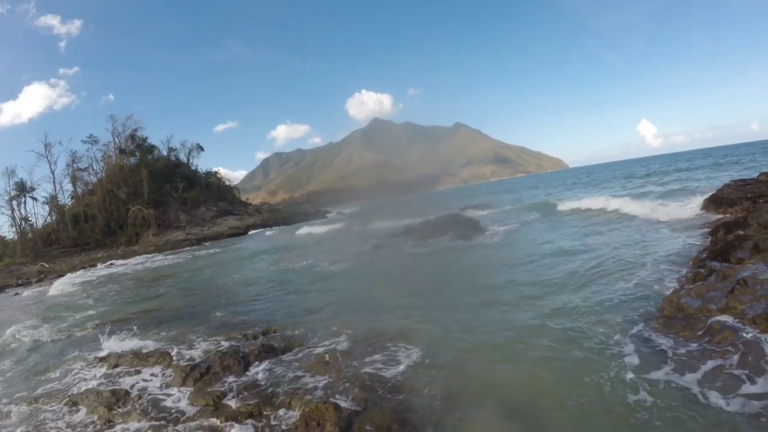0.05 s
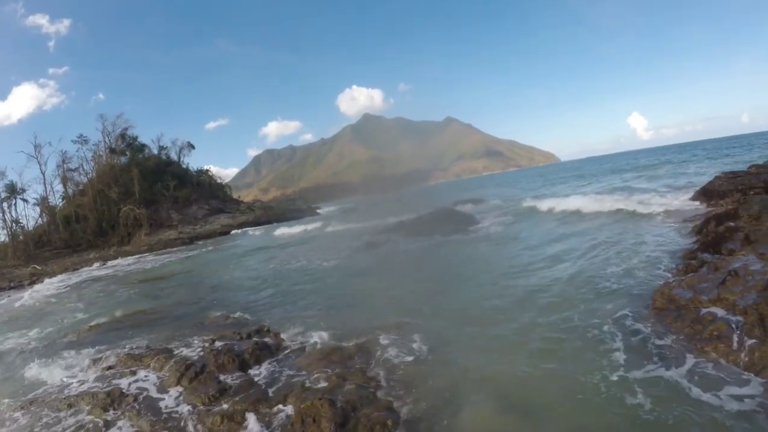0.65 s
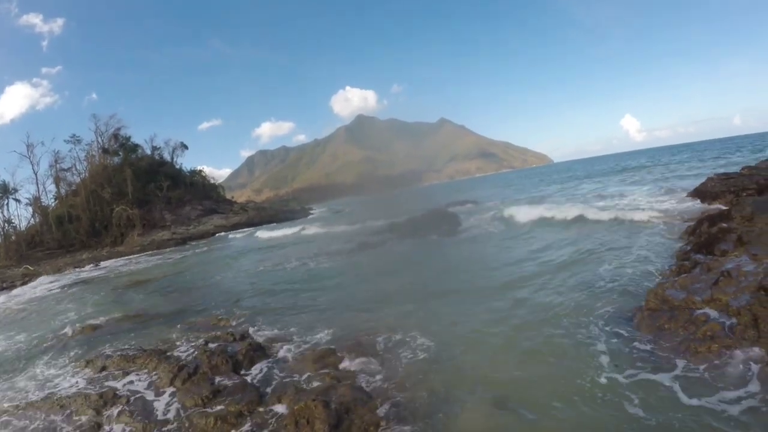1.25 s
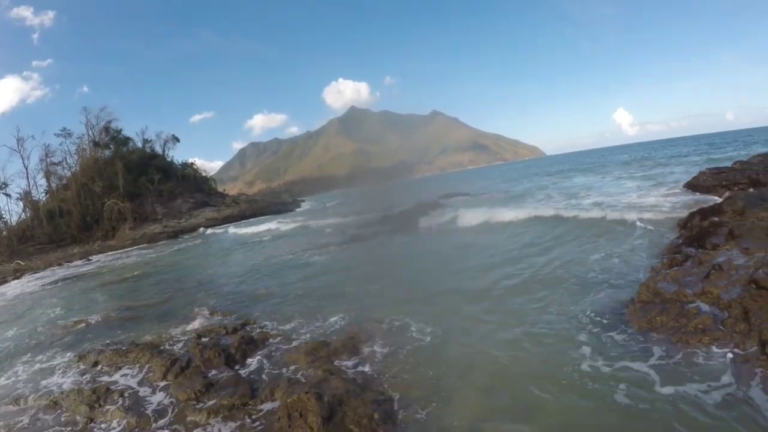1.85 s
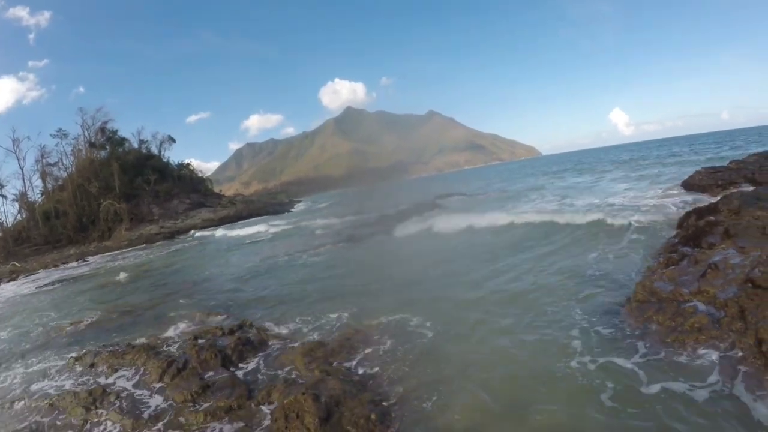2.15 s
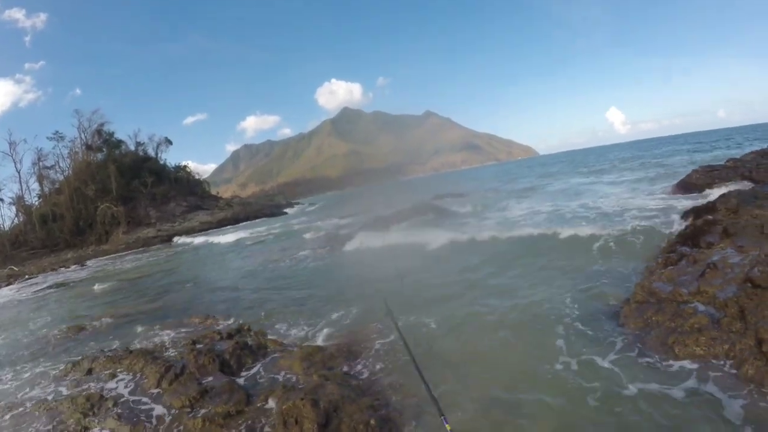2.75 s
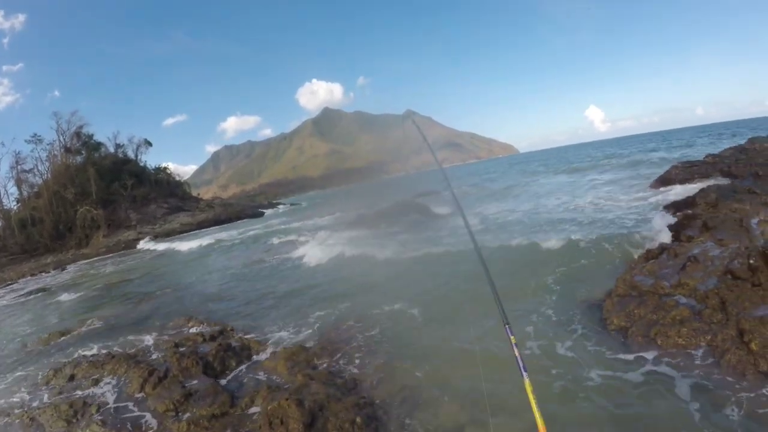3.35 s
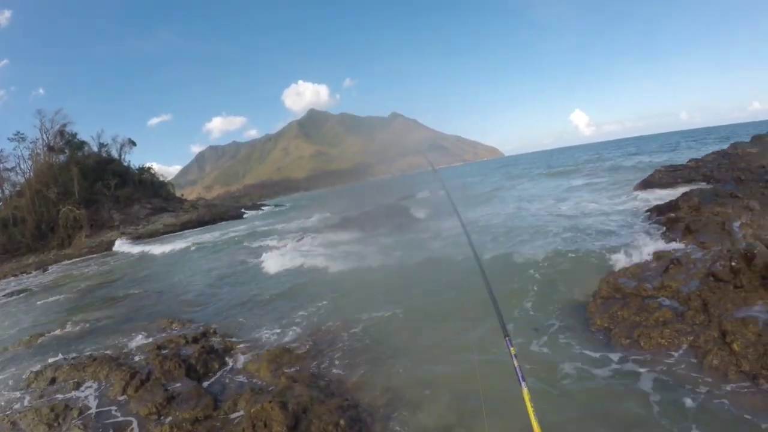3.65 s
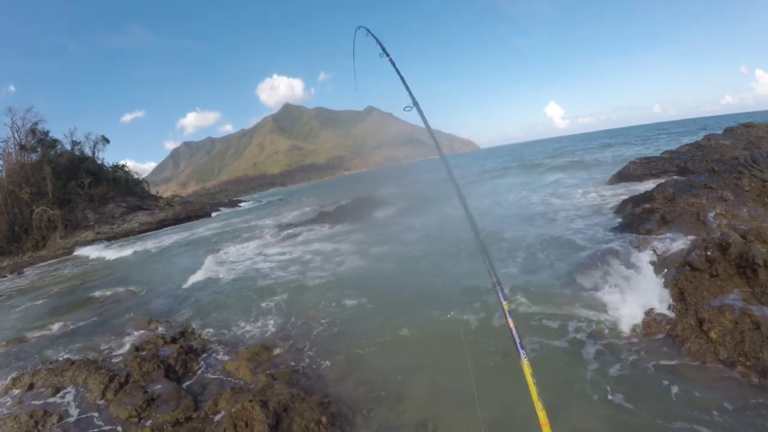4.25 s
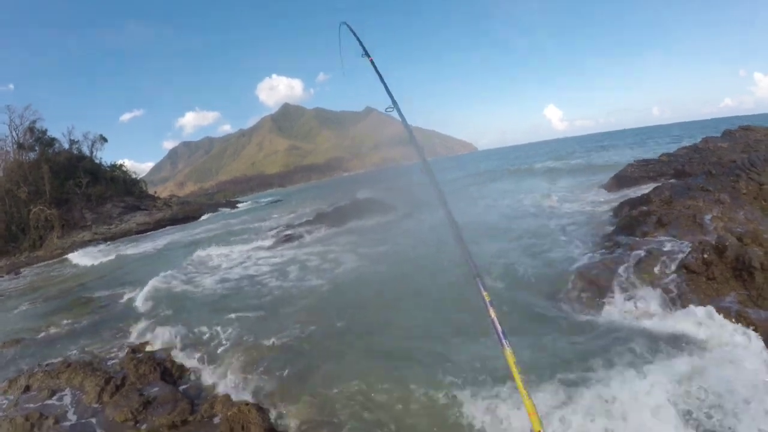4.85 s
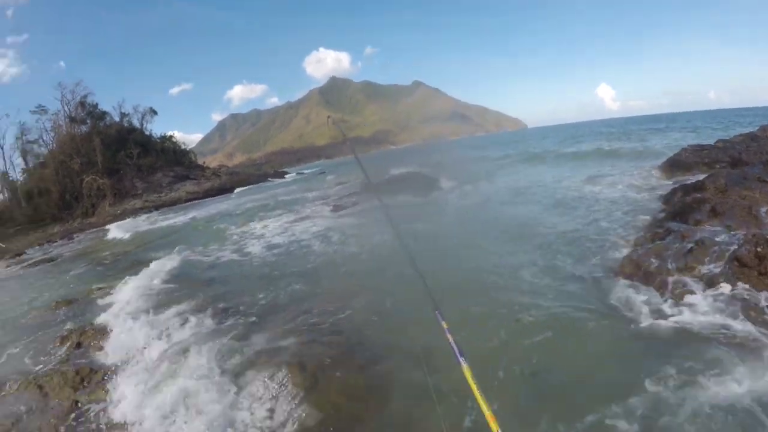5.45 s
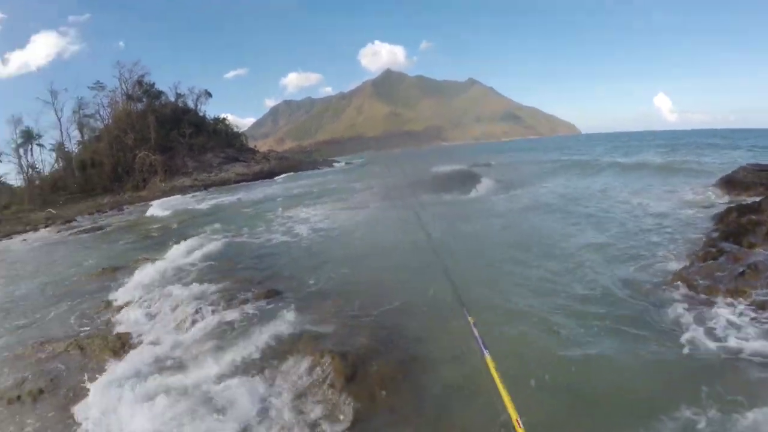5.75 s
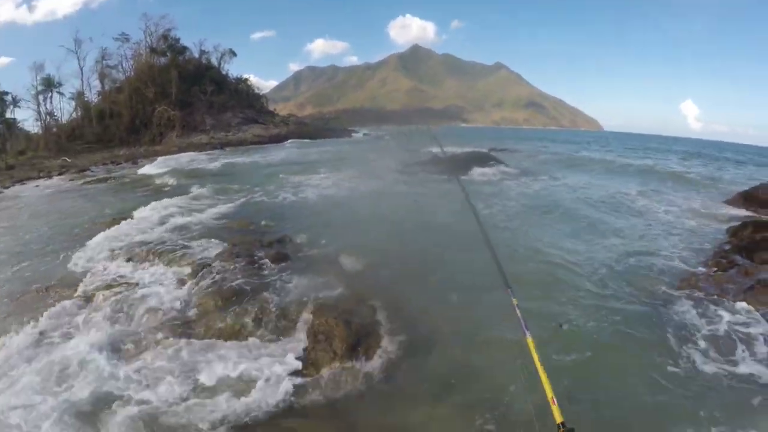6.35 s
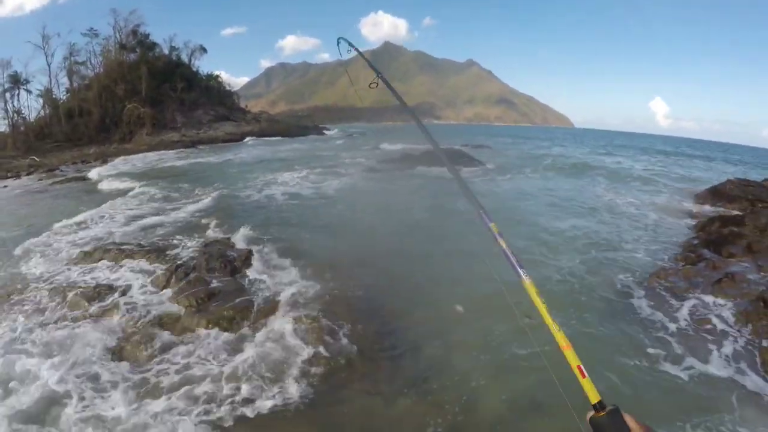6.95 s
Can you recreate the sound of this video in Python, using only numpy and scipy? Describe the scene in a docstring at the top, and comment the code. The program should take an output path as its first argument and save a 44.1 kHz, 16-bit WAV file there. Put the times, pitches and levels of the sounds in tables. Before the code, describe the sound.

Surf washes steadily, then a wave slaps and breaks over nearby rocks while wind rumbles on the microphone.

```python
"""Surf on a windy, rocky shore

Far breakers wash steadily. A near wave slaps the rocks on the right, bursts into spray, booms,
then pours over the rocks on the left and drains. The water is rushing noise plus thousands of
tiny ringing bubbles. We listen through a small camera with a left and a right microphone port
(sound hole); wind swirls against it and makes a low rumble."""
import sys
import numpy as np
from scipy import signal
from scipy.fft import rfft, irfft, next_fast_len
from scipy.io import wavfile
from scipy.ndimage import uniform_filter1d, map_coordinates

SR = 44100
rng = np.random.default_rng(int(sys.argv[2]) if len(sys.argv) > 2 else 0)


def put_to_file(sound):
    """Save the sound as 16-bit audio at rate SR, in the file named by the first command-line argument."""
    columns = np.atleast_2d(sound).T  # one column per channel
    safe = np.clip(columns, -1, 1)
    whole_steps = np.round(safe * 32767)
    wavfile.write(sys.argv[1], SR, whole_steps.astype(np.int16))


N = 312217
TIME = np.arange(N) / SR
TOP_HZ = 15000
SPLIT = np.array([[0.5], [-0.5]])  # adds half of a value on the left, takes half away on the right


def amp(db):
    """Turn decibels into a gain to multiply by."""
    return 10 ** (np.asarray(db) / 20)


def unit(x):
    """Scale a sound to an average (rms) strength of 1."""
    return x / np.sqrt(np.mean(x ** 2) + 1e-20)


def at_pitch(table, hz):
    """Read between the rows of a (frequency, value) table, on a log frequency scale."""
    row_hz, values = np.transpose(table)
    return np.interp(np.log(hz + 1), np.log(row_hz + 1), values)


def over_time(table):
    """Join the rows of a (time, value) table with straight lines."""
    return np.interp(TIME, *np.transpose(table))


def wobble(rate):
    """A smooth random curve through rate points a second."""
    points = rng.standard_normal(int(N * rate / SR) + 4)
    return map_coordinates(points, [np.arange(N) * rate / SR])


def swell(t, width):
    """A bell shape of height 1 around t = 0."""
    return np.exp(-(t / width) ** 2 / 2)


def filtered(x, response):
    """Multiply each frequency in x by response(hz)."""
    size = next_fast_len(N + SR // 2)
    return irfft(rfft(x, size) * response(np.fft.rfftfreq(size, 1 / SR)), size)[..., :N]


def rush(patchy_db):
    """Rushing water: two noises that share random loud and soft patches in time and pitch."""
    spectra = signal.stft(rng.standard_normal((2, N)), nperseg=512)[2]
    patches = uniform_filter1d(rng.standard_normal(spectra.shape[1:]), size=9, axis=0)
    patches = unit(uniform_filter1d(patches, size=11, axis=1))
    return unit(signal.istft(spectra * amp(patchy_db * patches), nperseg=512)[1][:, :N])


# The sea's tone through the camera's case: (frequency [Hz], relative level [dB])
SEA_TONE = [(100, -4.5), (250, 3), (400, -4.5), (800, 0), (1300, -2), (1950, -4.5), (2350, -7), (3250, -6),
            (4900, -12.5), (7000, -11), (8300, -19.5), (10500, -31), (13800, -39), (14800, -50)]
# Narrow bands that the case boosts or weakens: (frequency [Hz], width [Hz], gain [dB])
CASE_RESONANCES = [(1225, 76, 3), (1400, 56, 1.1), (1797, 210, 3), (2090, 90, 1.1), (2250, 98, -0.6),
                   (2450, 96, 0.9), (2770, 200, -2), (3130, 97, 1), (5100, 300, -0.6)]
def sea_tone_db(hz):
    """The sea's broad tone with the ringing of the case on top."""
    peaks = sum(db * np.exp(-((hz - centre) / width) ** 2) for centre, width, db in CASE_RESONANCES)
    return at_pitch(SEA_TONE, hz) + peaks


# How alike the two ports sound: (frequency [Hz], likeness [0-1])
PORT_LIKENESS = [(200, 1), (550, 0.4), (760, 0.07), (1000, 0.68), (1900, 0.83), (2400, 0.06), (3100, 0.69),
                 (4200, 0.72), (5000, 0.5), (6500, 0.46), (8200, 0), (12000, 0.2)]
# How much louder the left port is: (frequency [Hz], left minus right [dB])
PORT_BALANCE = [(200, -4), (330, -0.5), (520, -4), (760, -8.5), (1200, -3), (1500, -2.7), (2250, 2),
                (2700, -2.5), (3600, -3), (5500, -1.5), (7300, 4.5), (9000, 0)]
# How far ahead the left port's vibration is: (frequency [Hz], phase lead [rad])
PORT_PHASE = [(200, -0.6), (680, -0.03), (800, -4), (1050, -4.0), (1800, -4.5), (2150, -4.5), (2350, -1.5),
              (2800, 0.5), (4000, 0.4), (5100, -1), (6000, 0.1), (7200, 0), (8200, -3.6), (9500, -4.5)]
def at_ports(pair, tone):
    """Direct and scattered sound reach two ports on different faces of the camera."""
    def blend(hz):
        angle = np.arccos(np.clip(at_pitch(PORT_LIKENESS, hz), 0, 1)) / 2
        return amp(sea_tone_db(hz) + at_pitch(tone, hz)) * [np.cos(angle), np.sin(angle)]

    def ports(hz):
        return amp(SPLIT * at_pitch(PORT_BALANCE, hz)) * np.exp(1j * SPLIT * at_pitch(PORT_PHASE, hz))

    mid, side = filtered(pair, blend)  # what the ports share, and what sets them apart
    return unit(filtered(np.array([mid + side, mid - side]), ports))


def far_surf():
    """Distant breakers merge into an even wash, with a high band that leans to the left."""
    tone = [(150, 4), (370, -7.5), (480, 2.0), (10000, -2.5)]  # (frequency [Hz], gain [dB])
    # (frequency [Hz], left minus right [dB])
    lean = [(5900, 1.5), (7000, 10.0), (7800, 13.5), (8500, -8)]
    wash = at_ports(rush(patchy_db=2.0), tone)
    wash = filtered(wash, lambda hz: amp(SPLIT * at_pitch(lean, hz)))
    return amp(-34.5 + 0.27 * wobble(4.6)) * wash


def eddies(tone, steady_samples):
    """Swirls of air press on the whole case; the smallest differ from port to port."""
    apart = [(30, -38), (80, -18), (170, -16), (350, -8)]  # (frequency [Hz], side minus mid [dB])
    gains = lambda hz: amp([at_pitch(tone, hz), at_pitch(tone, hz) + at_pitch(apart, hz)])
    mid, side = filtered(rng.standard_normal((2, N)), gains)
    pair = np.array([mid + side, mid - side])
    # even out the noise, so that the gusts set the swells
    power = uniform_filter1d(np.mean(pair ** 2, axis=0), size=steady_samples)
    return unit(pair / np.sqrt(np.abs(power)))


# How hard the wind blows: (time [s], level [dB])
WIND_STRENGTH = [(0, -27), (.55, -29), (1.45, -25.5), (2.2, -25.5), (3.15, -26.5), (3.85, -27.5),
                 (4.78, -25), (5.2, -20), (5.9, -22.5), (6.35, -22.5), (7.0, -26)]
# Single gusts: (time [s], half length [s], rumble level [dB], flutter level [dB])
GUSTS = [(0.135, 0.027, -21.5, -28), (.32, 0.11, -25, -38), (0.483, 0.018, -40, -25),
         (0.72, 0.079, -21, -46), (0.832, 0.013, -21, -25.5), (0.925, 0.038, -24.5, -40),
         (1.11, 0.05, -33, -27), (1.263, 0.12, -25.5, -43), (1.455, 0.054, -23, -25.5),
         (1.637, 0.056, -21, -28.5), (1.758, 0.022, -20.5, -46), (1.9, 0.026, -20.5, -40),
         (2, 0.022, -18, -25.5), (2.05, 0.023, -28, -29), (2.2, 0.061, -38, -25.5),
         (2.373, 0.041, -18.5, -26.5), (2.577, 0.06, -29, -31), (2.725, 0.043, -21.5, -26),
         (2.956, 0.029, -21, -21), (3.374, 0.06, -42, -27), (3.626, .04, -30, -30),
         (4.008, 0.026, -18, -21), (4.234, 0.055, -23, -28), (4.42, 0.09, -21.5, -22),
         (4.547, 0.063, -21, -25), (4.68, 0.033, -21, -19), (4.893, 0.03, -25, -17),
         (5.125, 0.087, -23, -21), (5.282, 0.023, -27, -13), (5.354, 0.035, -15, -21),
         (5.442, 0.034, -10.5, -38), (5.69, 0.037, -15, -32), (5.864, 0.075, -26, -20),
         (5.998, 0.04, -29, -16.5), (6.185, 0.051, -20, -23.5), (6.614, 0.088, -40, -23.5),
         (6.73, 0.061, -18, -21.5), (6.875, .05, -17.5, -22), (7.016, 0.075, -19.5, -21.5)]
# The deep rumble of large swirls: (frequency [Hz], relative level [dB])
RUMBLE_TONE = [(8, -35), (20, 3), (45, 0.5), (70, -2), (110, -21.5), (250, -41), (600, -84)]
# The quicker flutter of small swirls: (frequency [Hz], relative level [dB])
FLUTTER_TONE = [(40, -43), (75, 1), (115, 1.5), (170, -5), (230, -13.5), (330, -24), (500, -57),
                (1000, -67)]
def wind(flutter_offset_db=-2):
    """One wind drives both a lumpy rumble and a flutter; single gusts add to both."""
    wind_db = over_time(WIND_STRENGTH)
    rumble_db = wind_db + 2.0 * wobble(24)
    flutter_db = wind_db + flutter_offset_db + 1.4 * wobble(24)
    power = amp([rumble_db, flutter_db]) ** 2
    for time, width, *levels_db in GUSTS:
        power += (amp(levels_db)[:, None] * swell(TIME - time, width)) ** 2
    rumble, flutter = np.sqrt(power)
    return rumble * eddies(RUMBLE_TONE, SR // 12) + flutter * eddies(FLUTTER_TONE, SR // 14)


# Surges of water breaking on the rocks: (crest time [s], rise [s],
# time for the splash to fade 60 dB [s], foam level [dB], splash level [dB], spray level [dB])
SURGES = [(.2, .16, 2.1, -33.5, -40, -51), (.52, 0.12, 1.6, -35.5, -34, -49),
          (2.2, 0.28, 10, -38.5, -37, -46), (3.3, 0.91, 3.5, -38.5, -39.5, -50),
          (3.59, 0.014, 1.8, -35, -34.5, -36.5), (4.025, 0.041, 1.8, -37, -30, -33),
          (4.13, 0.04, 2.8, -32.5, -43, -36), (4.398, 0.0069, 7.2, -30.5, -30, -31.5),
          (4.88, 0.18, 3.1, -30.5, -27.5, -28), (5.11, 0.1, 4.1, -25.5, -26, -41),
          (5.275, 0.023, 1.4, -25, -33, -35), (5.41, 0.02, 0.67, -23, -26.5, -30),
          (5.49, .015, 1.3, -26, -32.5, -46), (5.58, 0.04, 4.8, -29.5, -34, -46),
          (5.9, 0.12, 3.7, -22, -28, -34), (6.065, 0.052, 1.5, -25.5, -26.5, -38),
          (6.135, 0.03, 1.2, -25.5, -29, -37), (6.3, 0.045, 3, -35, -32, -35.5),
          (6.75, 0.23, 2.8, -31.5, -33.5, -43)]
def near_water_levels():
    """Foam, splash and spray levels in dB: each surge swells and drains over steady lapping."""
    lapping_db = np.array([[-37.5], [-36], [-41]])  # foam, splash, spray
    fade_share = np.array([[0.97], [1], [0.96]])  # their shares of a surge's fade time
    power = amp(lapping_db) ** 2
    for crest, rise, fade_s, *levels_db in SURGES:
        rising = swell(np.minimum(TIME - crest, 0), rise)
        draining = amp(-60 * np.maximum(TIME - crest, 0) / (fade_s * fade_share))
        power = power + (amp(levels_db)[:, None] * rising * draining) ** 2
    return 10 * np.log10(power)


def bubbles(pitch_hz, spread, cycles, vary_db, rise, count, samples):
    """Two swarms of bubbles: each bubble rings briefly, rising in pitch as it nears the surface."""
    swarms = []
    for _ in range(2):
        start = rng.integers(0, N, (count, 1))
        hz = np.clip(pitch_hz * np.exp(spread * rng.standard_normal((count, 1))), 100, TOP_HZ)
        strength = amp(vary_db * np.minimum(rng.exponential(size=(count, 1)), 4))
        age = hz * np.arange(samples) / SR / cycles  # 1 after about that many cycles
        glide = 1 + rise * np.minimum(age, 2) / 2
        rings = strength * np.exp(-np.pi * age) * np.sin(2 * np.pi * cycles * age * glide)
        positions = start + np.arange(samples)
        swarms.append(unit(np.bincount(positions.ravel(), rings.ravel(), N)[:N]))
    return np.array(swarms)


# How foam shapes the sea's tone, with a thin sizzle on top: (frequency [Hz], gain [dB])
FOAM_TONE = [(100, -13), (300, -4.5), (450, -2.5), (700, -2), (1050, 2), (1600, 0.3), (2200, -9),
             (3100, -17), (4400, -6.5), (6500, -15), (8000, -5.5), (10000, 1.5), (14000, -15)]
def foam(level_db):
    """Large bubbles churn in the tumbling water."""
    gurgle = bubbles(pitch_hz=835.5, spread=0.453, cycles=13.6, vary_db=2.0, rise=0.27,
                     count=2200, samples=1200)
    loudness = amp(level_db + 0.58 * wobble(30))
    return loudness * at_ports(rush(patchy_db=0.44) + amp(-12.5) * gurgle, FOAM_TONE)


# How splashing shapes the sea's tone: (frequency [Hz], gain [dB])
SPLASH_TONE = [(500, -2), (1200, -12), (1900, 0.6), (3300, 0.6), (5500, 2.5), (7000, -8), (12000, -20)]
def splash(level_db):
    """Sheets of water fall back and make small bubbles."""
    patter = bubbles(pitch_hz=2470, spread=0.45, cycles=6.6, vary_db=1.5, rise=0.23,
                     count=4500, samples=260)
    loudness = amp(level_db + 0.98 * wobble(35))
    return loudness * at_ports(rush(patchy_db=1.0) + amp(-11.5) * patter, SPLASH_TONE)


# How spray shapes the sea's tone: (frequency [Hz], gain [dB])
SPRAY_TONE = [(1000, -24), (3000, -11), (4500, -4.5), (5500, 0), (7200, -3.5), (8600, -2), (11000, 0),
              (14000, 4.5)]
def spray(level_db):
    """Fine drops and bursting froth hiss."""
    fizz = bubbles(pitch_hz=5960, spread=0.43, cycles=3.5, vary_db=2.5, rise=0.1,
                   count=7000, samples=70)
    loudness = amp(level_db + 0.7 * wobble(60))
    return loudness * at_ports(rush(patchy_db=3.0) + amp(-6.0) * fizz, SPRAY_TONE)


# Water slapping the rocks: (time [s], level [dB])
SLAPS = [(.2, -27), (.975, -31), (3.385, -27), (3.582, -24.5), (3.611, -24), (3.699, -26), (3.833, -24),
         (3.953, -19.5), (4.017, -19.5), (4.138, -18.5), (4.398, -24), (4.697, -23), (4.942, -18),
         (5.096, -17), (5.171, -20), (5.288, -16), (5.380, -16), (5.396, -21), (5.419, -18), (5.891, -20)]
def slaps(attack_s=0.0006, fade_s=0.028):
    """Each slop of water hits the rock with a short, bright burst."""
    bursts = np.zeros(N)
    for time, db in SLAPS:
        age = np.maximum(TIME - time, 0)
        bursts += amp(db - 60 * age / fade_s) * (1 - np.exp(-age / attack_s))
    tone = [(400, -19), (1800, -0.5), (3500, -4), (6500, -1.5)]  # (frequency [Hz], gain [dB])
    return bursts * at_ports(rng.standard_normal((2, N)), tone)


# Puffs of wind: (time [s], half length [s], level [dB])
PUFFS = [(1.117, 0.042, -28), (1.37, 0.2, -27.5), (1.892, 0.046, -25.5), (3.38, 0.025, -39),
         (6.575, 0.082, -22), (6.727, 0.094, -23), (6.997, 0.046, -16)]
# Their dull tone: (frequency [Hz], relative level [dB])
PUFF_TONE = [(60, 7), (170, 3), (300, -1), (450, -12.5), (650, -16), (1300, -55)]
def puffs():
    """Swirls of air catch the left port alone and ruffle it."""
    strength = sum(amp(db) * swell(TIME - time, width) for time, width, db in PUFFS)
    ruffle = unit(filtered(rng.standard_normal(N), lambda hz: amp(at_pitch(PUFF_TONE, hz))))
    return np.array([[1], [0]]) * strength * amp(0.98 * wobble(45)) * ruffle


# How loud the air under the falling wave booms: (time [s], level [dB])
BOOM_LEVEL = [(3.9, -73), (4.6, -41), (5.2, -45), (5.35, -28), (5.435, -19), (5.5, -37), (5.62, -27.5),
              (5.9, -32), (6.5, -42), (7.08, -37)]
# How the boom shapes the sea's tone: (frequency [Hz], gain [dB])
BOOM_TONE = [(80, 8.5), (250, 0.5), (350, 2), (450, 6.5), (600, -17), (900, -33), (2000, -40)]
def boom():
    """Clouds of trapped air boom as the wave lands."""
    loudness = amp(over_time(BOOM_LEVEL) + 1.6 * wobble(13))
    return loudness * at_ports(rush(patchy_db=2.5), BOOM_TONE)


# Big pockets of air gulping between the rocks: (time [s], starting pitch [Hz], level [dB])
GULPS = [(4.972, 827, -18), (5.425, 559, -16), (6.052, 825, -13), (6.13, 895, -15.5)]
def gulps(attack_s=0.007, fade_s=0.067, rise_per_s=0.8):
    """A big bubble closes, rings low and rises in pitch; its foamy walls make it waver."""
    rings = np.zeros(N)
    for time, hz, db in GULPS:
        age = np.maximum(TIME - time, 0)
        pitch = hz * (1 + rise_per_s * np.minimum(age, fade_s) + 0.063 * wobble(200))
        loudness = amp(db - 60 * age / fade_s) * (1 - np.exp(-age / attack_s))
        rings += loudness * np.sin(2 * np.pi * np.cumsum(pitch) / SR)
    return filtered(rings, lambda hz: amp(SPLIT * at_pitch(PORT_BALANCE, hz)))


# Where the near water breaks, positive is left: (time [s], left port's head start [microseconds])
WAVE_DIRECTION = [(0, 0), (3.2, -6), (3.7, 3), (5.0, -34), (5.5, -1), (5.85, 76), (6.3, 65), (6.8, 42)]
# How much sound keeps its direction through the case: (frequency [Hz], share [0-1])
DIRECTED_SHARE = [(3900, 0), (5100, 1)]
def placed(pair, shade_db=0.0, full_lead_us=70):
    """High sounds reach the nearer port first; with shade_db, the case also shields the farther one."""
    lead_us = over_time(WAVE_DIRECTION)
    positions = np.arange(N) + SPLIT * lead_us * SR / 1e6
    highs = filtered(pair, lambda hz: at_pitch(DIRECTED_SHARE, hz))
    shifted = np.array([map_coordinates(port, [at]) for port, at in zip(highs, positions)])
    return amp(SPLIT * shade_db * lead_us / full_lead_us) * (pair - highs + shifted)


def scene():
    """Far surf, the near wave and the wind, added together."""
    foam_db, splash_db, spray_db = near_water_levels()
    # the camera blocks some of the high sound, while low sound bends round it
    bright = placed(splash(splash_db) + spray(spray_db) + slaps(), shade_db=1.5)
    return far_surf() + placed(foam(foam_db) + boom() + gulps()) + bright + wind() + puffs()


def record(dry):
    """The camera rounds off the loudest peaks and keeps nothing above TOP_HZ."""
    rounded = dry / (1 + np.abs(dry / 0.92) ** 8) ** (1 / 8)
    return filtered(rounded, lambda hz: hz < TOP_HZ)


dry = scene()
out = record(dry)
put_to_file(out)
```